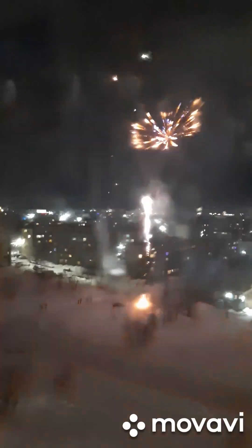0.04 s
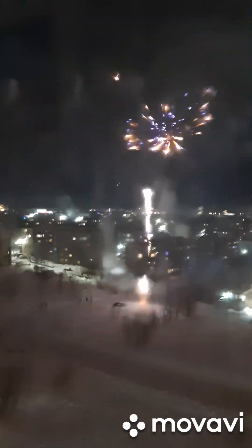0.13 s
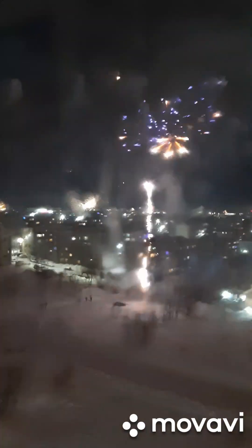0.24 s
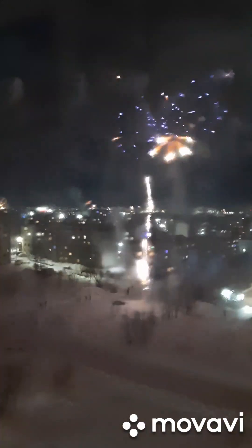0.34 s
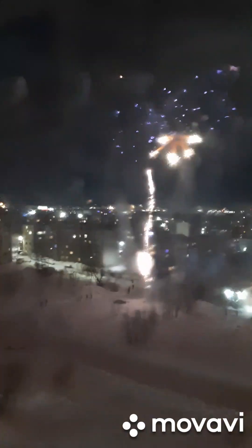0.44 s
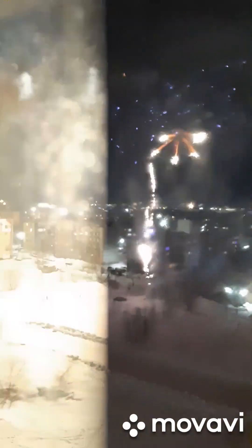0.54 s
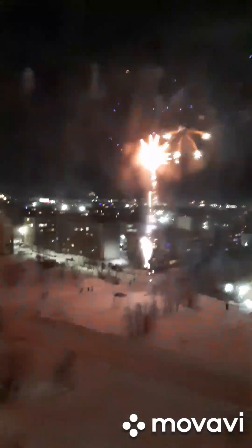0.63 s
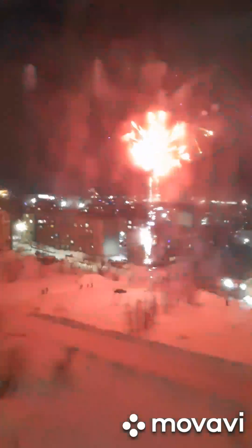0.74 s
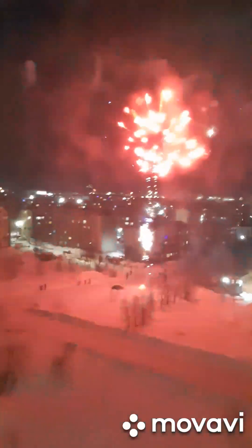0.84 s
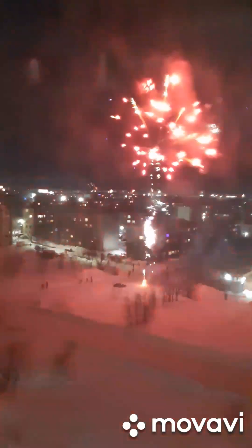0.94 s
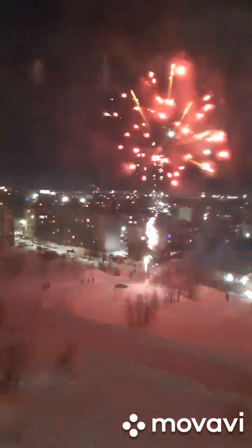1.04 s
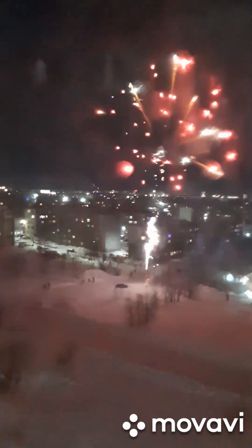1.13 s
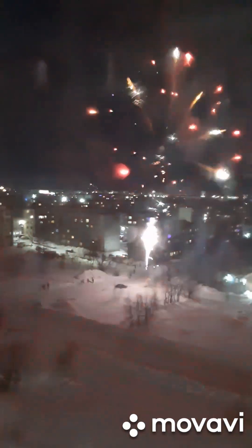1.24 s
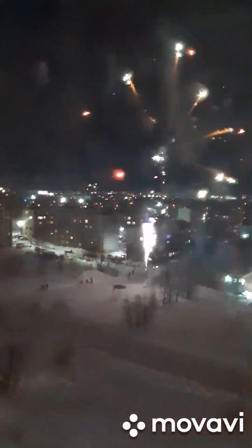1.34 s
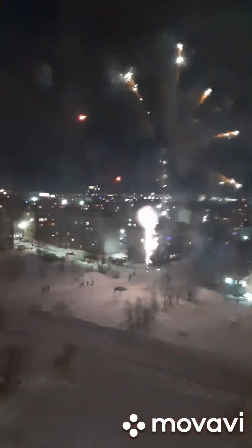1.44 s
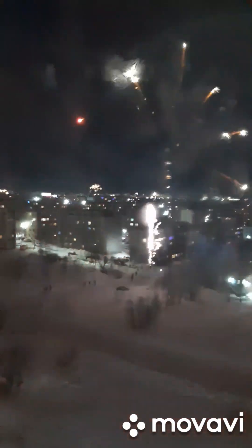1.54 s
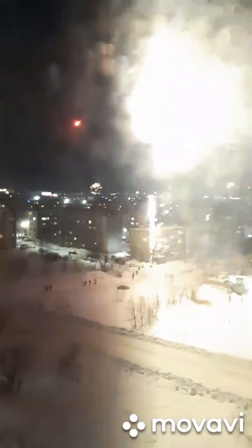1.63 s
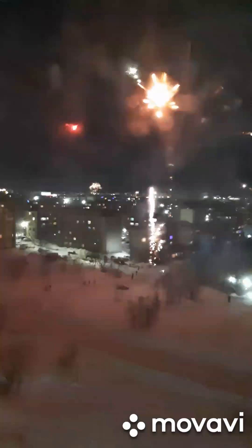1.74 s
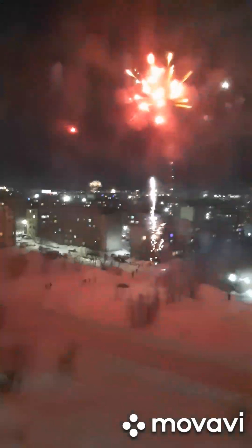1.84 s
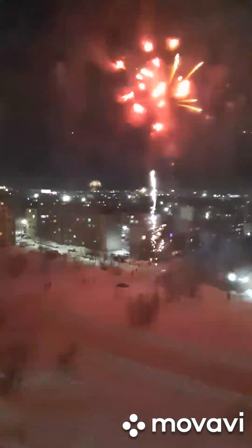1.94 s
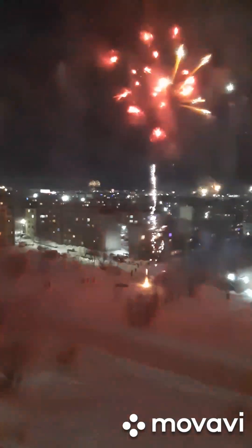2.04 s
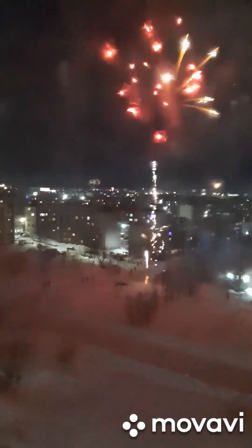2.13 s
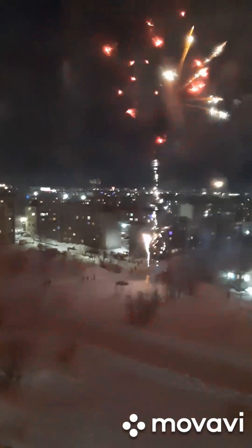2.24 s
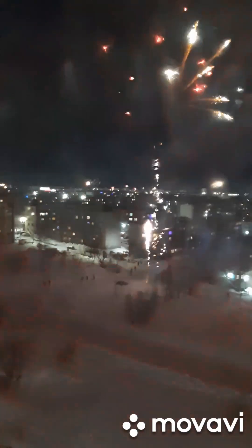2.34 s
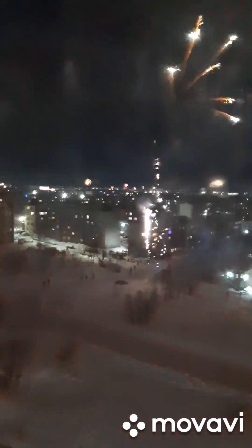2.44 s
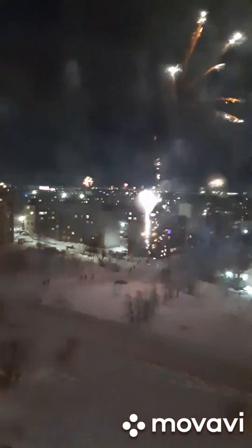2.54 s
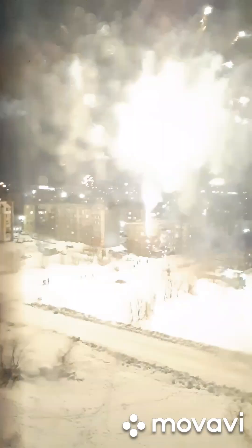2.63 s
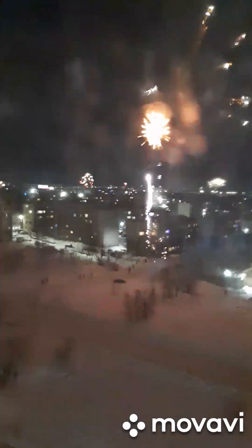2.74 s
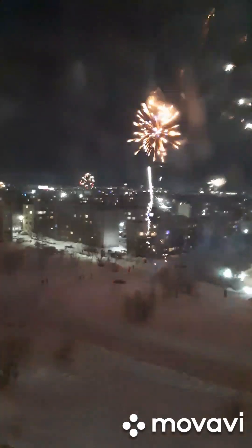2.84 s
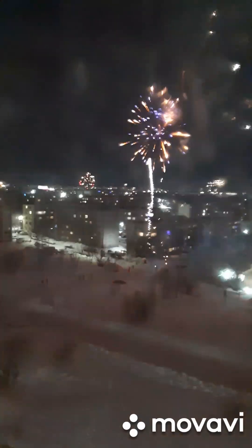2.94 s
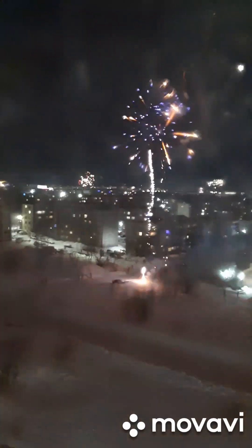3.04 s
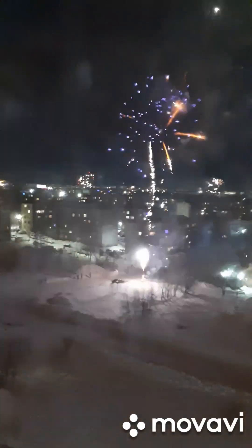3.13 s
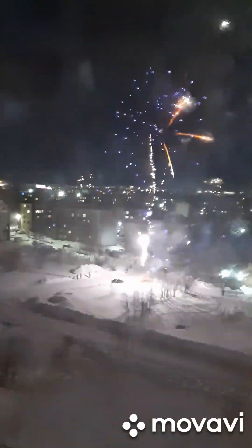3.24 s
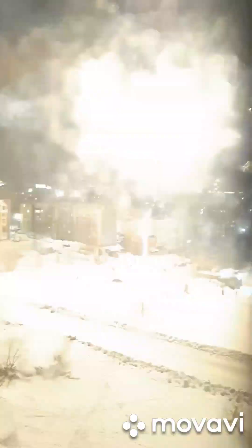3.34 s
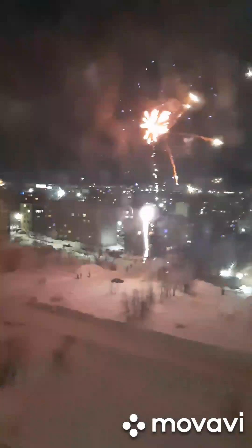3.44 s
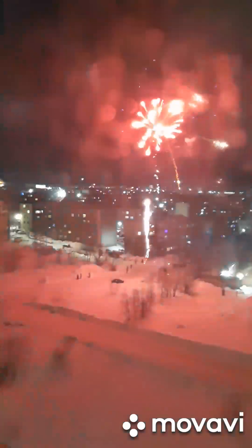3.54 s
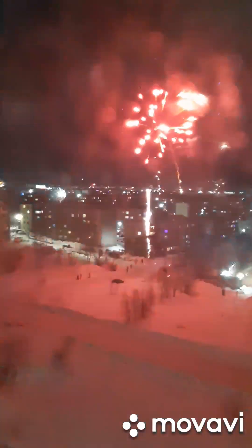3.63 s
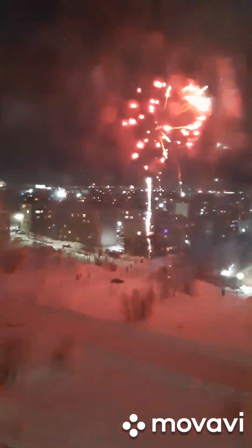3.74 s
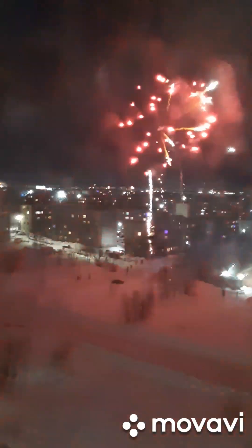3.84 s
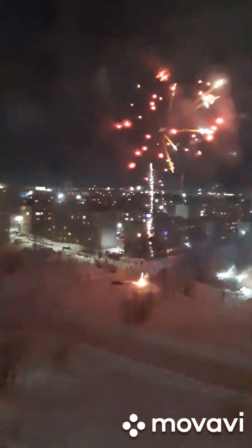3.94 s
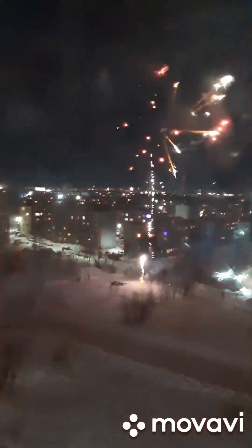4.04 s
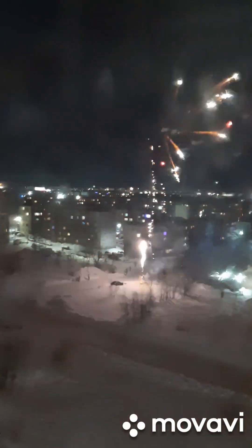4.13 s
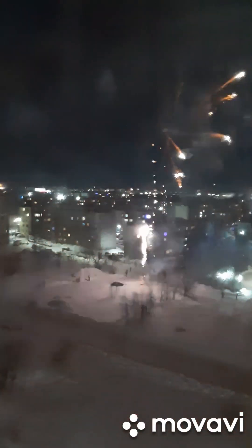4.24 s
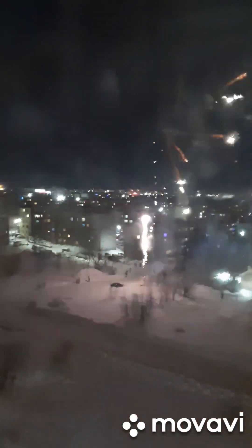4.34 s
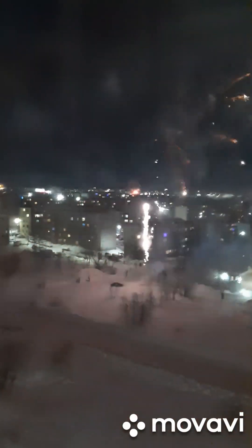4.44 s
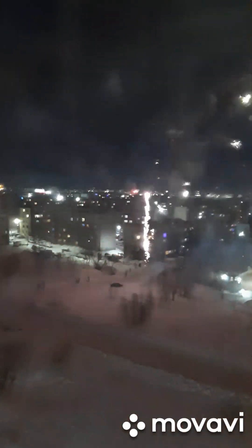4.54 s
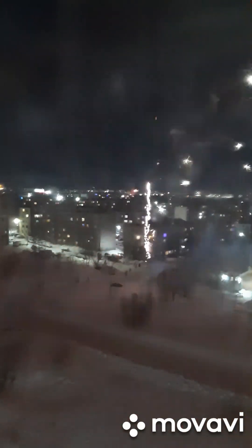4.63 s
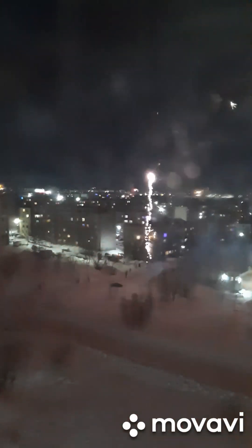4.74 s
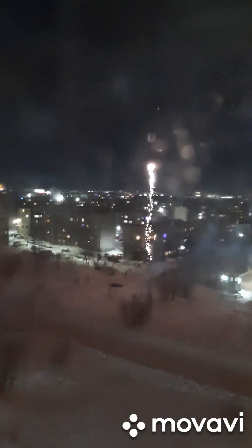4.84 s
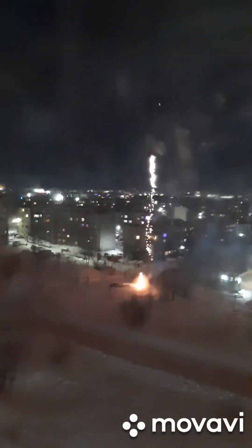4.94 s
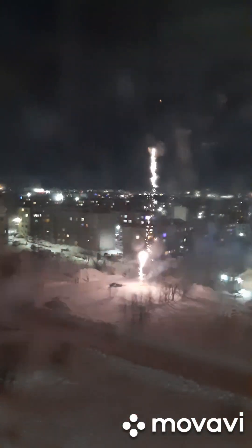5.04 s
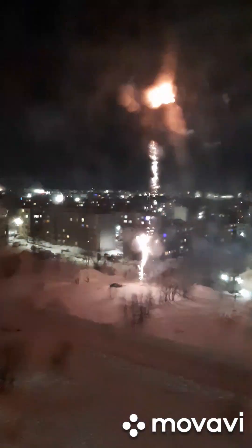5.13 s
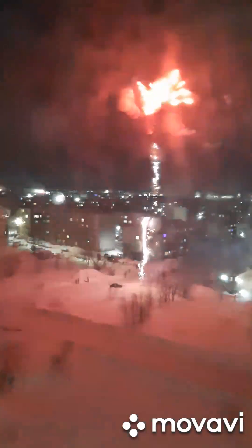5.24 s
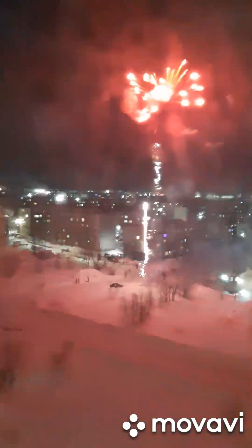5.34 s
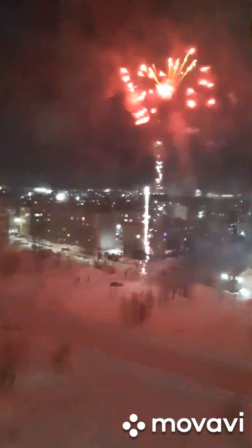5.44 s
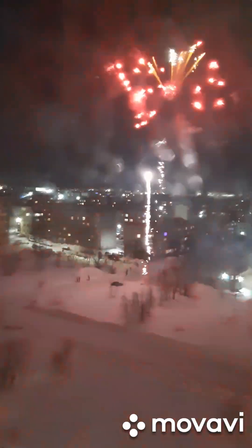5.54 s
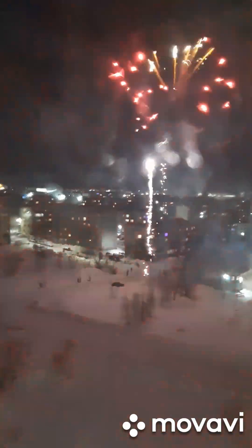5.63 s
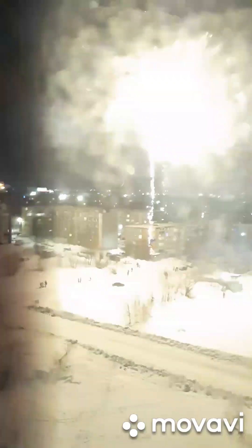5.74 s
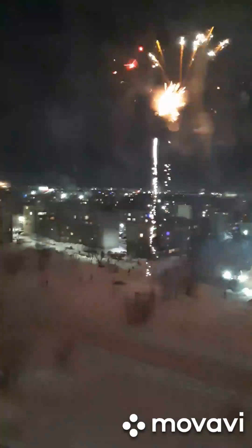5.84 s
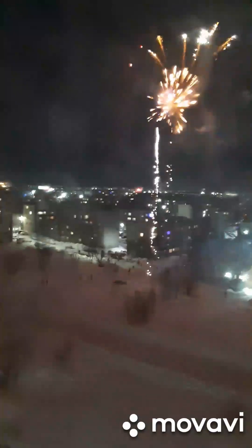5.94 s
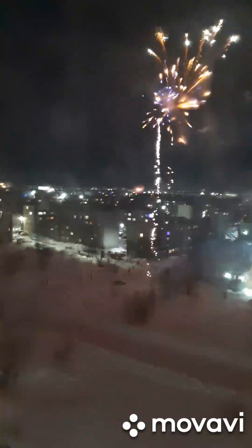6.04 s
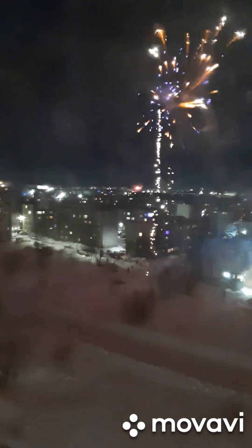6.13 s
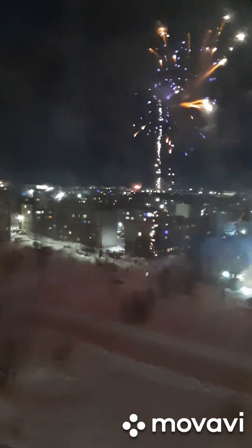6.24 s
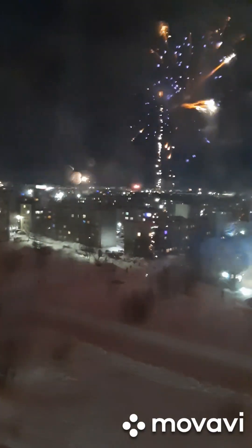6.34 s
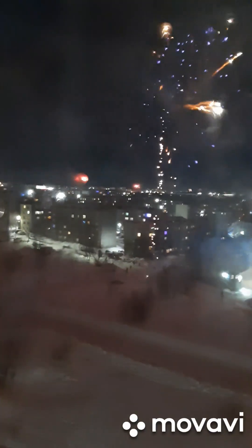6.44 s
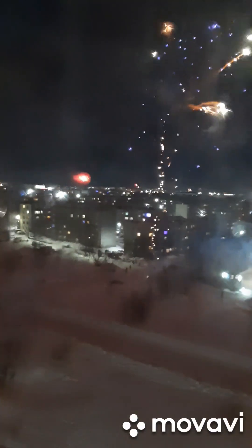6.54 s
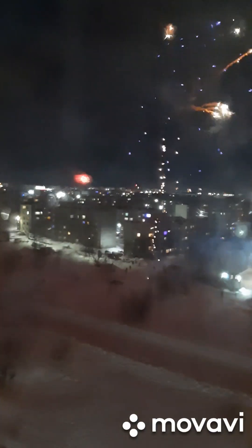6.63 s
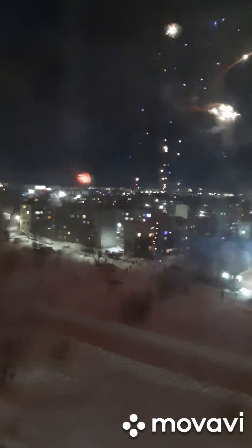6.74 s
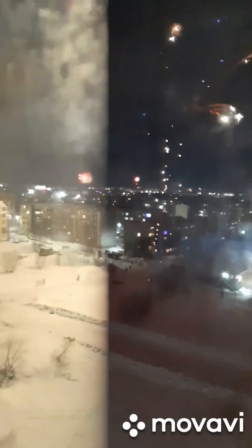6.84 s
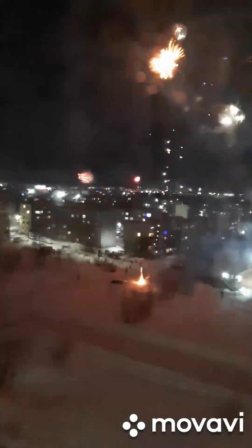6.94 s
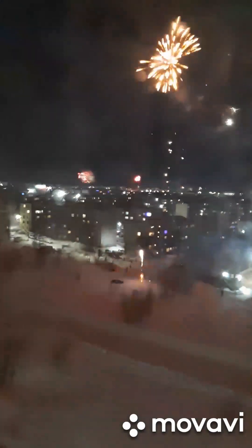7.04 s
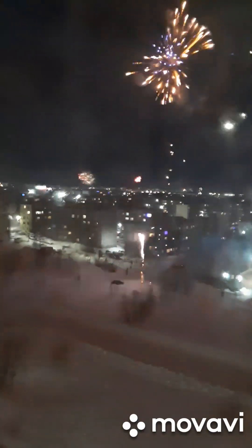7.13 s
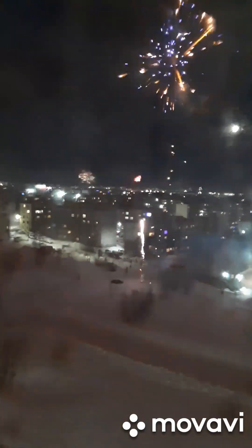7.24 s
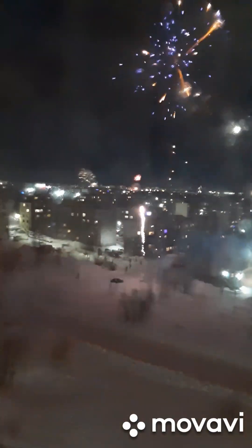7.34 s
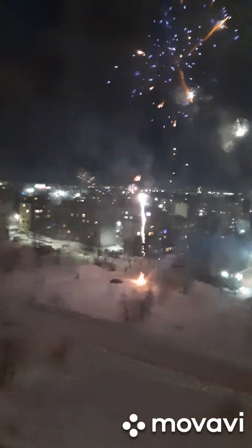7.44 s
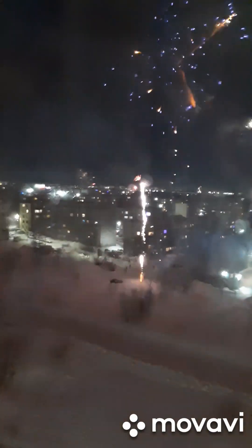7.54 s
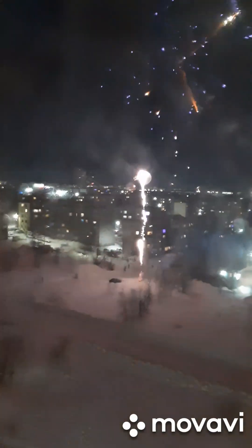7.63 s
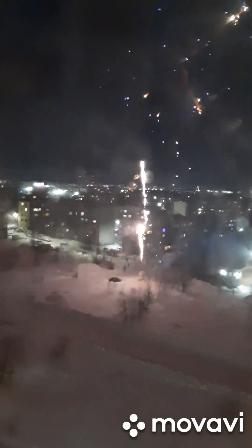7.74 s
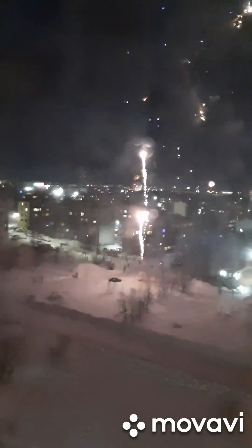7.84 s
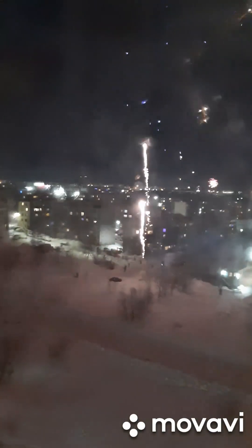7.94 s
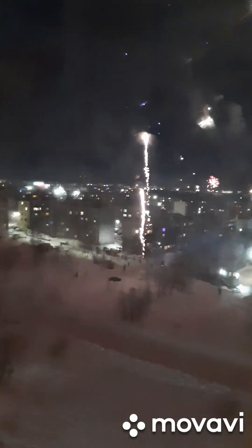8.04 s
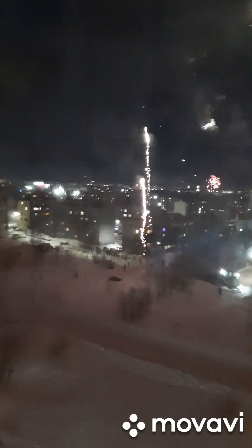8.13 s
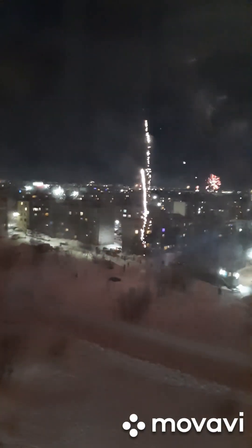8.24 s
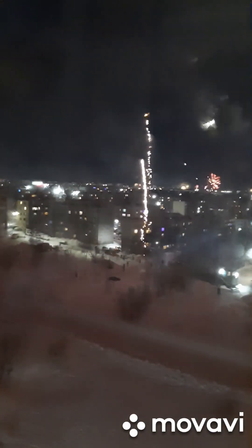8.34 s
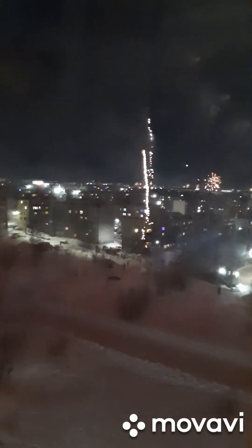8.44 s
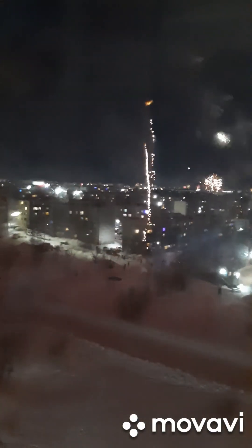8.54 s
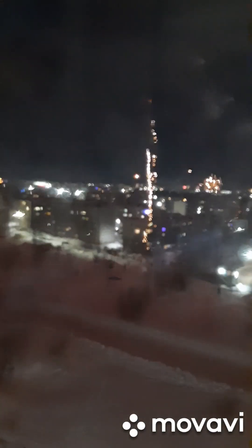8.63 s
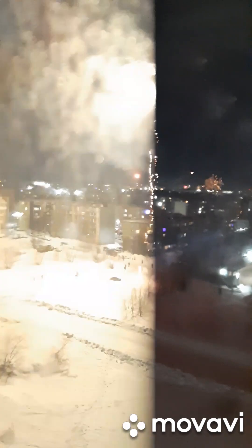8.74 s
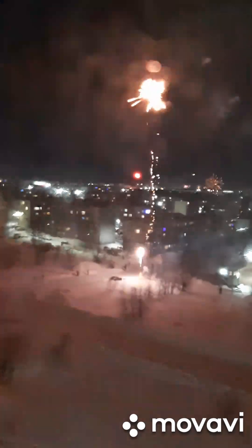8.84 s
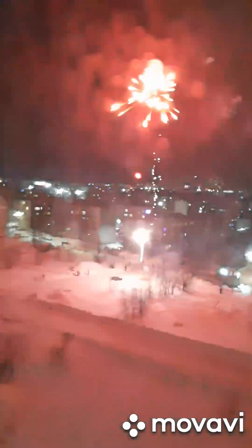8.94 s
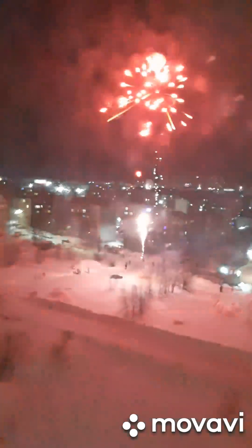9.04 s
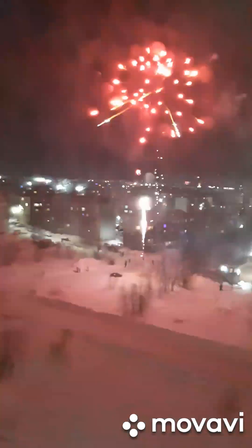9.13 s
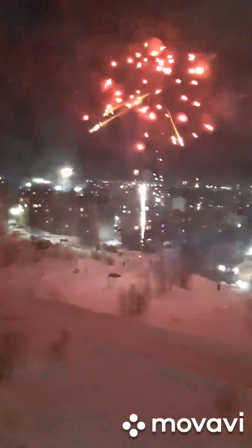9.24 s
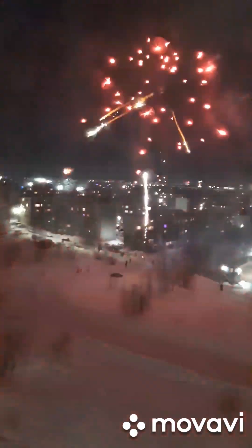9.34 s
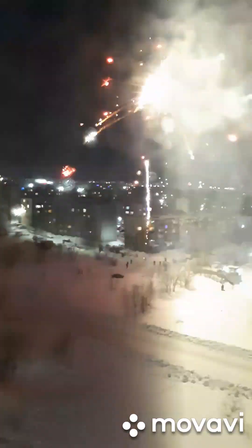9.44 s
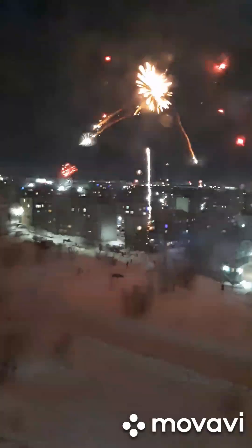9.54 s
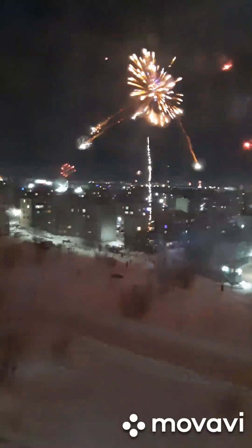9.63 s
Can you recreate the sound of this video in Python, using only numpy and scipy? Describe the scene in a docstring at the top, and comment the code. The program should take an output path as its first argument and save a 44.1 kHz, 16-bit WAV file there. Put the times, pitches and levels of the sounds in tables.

```python
"""A dull rumble and a brush of cloth, then firework bursts, heard indoors through a closed window.
It is night over a snowy yard. Each burst knocks the pane and rings the room the same way: a sum of
decaying sines. Launches are short low pulses. Soft thuds, late echoes, brief narrow-band patches and the
rumble of the town are noise with its own swells, and so are the cloth near the microphones and the hiss."""
import sys
import numpy as np
from scipy import signal
from scipy.fft import rfft, irfft, next_fast_len
from scipy.io import wavfile
from scipy.ndimage import uniform_filter1d

SR = 44100
rng = np.random.default_rng(int(sys.argv[2]) if len(sys.argv) > 2 else 0)


def generate_wav(sig):
    """Save sig (samples, or channels by samples) to the path in sys.argv[1] as 16-bit PCM at SR."""
    pcm = np.round(np.clip(np.atleast_2d(sig).T, -1, 1) * 32767).astype(np.int16)
    wavfile.write(sys.argv[1], SR, pcm)


N = 426447  # length in samples


def gain_of(db):
    """Turns decibels into a factor."""
    return 10 ** (np.asarray(db) / 20)


def evened(x):
    """Scales a sound to an average strength (rms) of 1."""
    return x / np.sqrt(np.mean(x ** 2) + 1e-20)


def read(points, hz):
    """Reads a table of (Hz, value) points, joined by straight lines over log frequency."""
    f, value = np.transpose(points)
    return np.interp(np.log(hz + 1), np.log(f + 1), value)


# How alike the two channels of a noise are.
# Each row: frequency in Hz, likeness (1 the same, 0 unrelated, below 0 partly opposed).
LIKENESS = [(60, 0.91), (180, 1), (550, 0.77), (1650, -0.2), (4970, -0.13), (15000, -0.04)]


def noise(colour, alike=True):
    """Two channels of coloured noise, as alike as the sound field makes them, or unrelated."""
    size = next_fast_len(N)
    hz = np.fft.rfftfreq(size, 1 / SR)
    left, other = rfft(rng.standard_normal((2, size)))
    same = np.clip(read(LIKENESS, hz), -1, 1) * alike
    right = same * left + np.sqrt(1 - same ** 2) * other
    coloured = np.array([left, right]) * gain_of(read(colour, hz))
    return evened(irfft(coloured, size)[:, :N])


def swell(events, rise, t60):
    """Envelope of events (s, dB) that rise and die away, each for 2 s at most; their powers add."""
    power = np.zeros(N)
    t = np.arange(2 * SR) / SR
    rises = rise * np.ones(len(events))
    falls = t60 * np.ones(len(events))  # seconds to fall by 60 dB
    for (start, db), up, fall in zip(events, rises, falls):
        part = power[round(start * SR):][:len(t)]
        envelope = gain_of(db - 60 * t / fall) * np.minimum(t / up, 1)
        part += envelope[:len(part)] ** 2  # adds into power itself
    return np.sqrt(power)


def uneven(depth_db, seconds):
    """A gain that wanders at random, with a new target every few moments and an rms of 1."""
    wander = np.interp(np.arange(N) / SR / seconds, np.arange(2000), rng.standard_normal(2000))
    return evened(gain_of(depth_db * wander))


def patchy(x, patchy_db, bins, frames):
    """Random patches of frequency and time swell and sink; the bass stays nearly even."""
    hz, _, z = signal.stft(x, SR, nperseg=1024)
    patches = rng.standard_normal(z.shape[:0:-1])  # time by frequency
    patches = uniform_filter1d(patches, frames, axis=0)
    patches = evened(uniform_filter1d(patches, bins, axis=1)).T
    patches = patches * read([(300, 0.058), (700, 1)], hz)[:, None]
    return evened(signal.istft(z * gain_of(patchy_db * patches), nperseg=1024)[1][:, :N])


# Pane and room ringing together.
# Each row: pitch in Hz, level in dB against the other rows, time to fall by 60 dB in seconds,
# direction of the first swing at the microphones (1 or -1).
ROOM_MODES = [(89.5, -26.5, 0.31, -1), (114.6, -15, 0.23, -1), (132.34, -15, 0.56, -1),
              (138.5, -19, 0.61, 1), (150.4, -11, 0.48, -1), (169, -13, 0.52, 1), (189.06, -7.5, 0.59, 1),
              (214.3, 1, 0.15, 1), (224.57, -1.5, 0.36, -1), (245.4, -11, 1.0, 1), (248, -15, 1, -1),
              (264.4, -9, 0.32, 1), (284.6, -14.5, 0.53, 1), (276, -32.5, 0.41, 1),
              (326.3, -14.5, 0.72, -1), (345.5, -3.5, 0.14, -1), (392.8, -19.5, 0.38, 1),
              (403, -24.5, 0.18, 1), (449, -21.5, 0.96, 1), (501.8, -18.5, 1, -1), (574.4, -9.5, 0.044, 1),
              (697, -25, 0.2, -1), (850.7, -16.5, 0.12, -1), (954, -12, 0.039, 1)]
# The blast arrives again, inverted. In order: delay in seconds, factor.
GROUND_ECHO = (.0198, -.62)


def ring():
    """The answer of pane and room to one blast and its ground echo: decaying sines, one per mode."""
    t = np.arange(SR) / SR
    modes = sum(np.sign(way) * gain_of(db - 60 * t / t60) * np.sin(2 * np.pi * hz * t)
                for hz, db, t60, way in ROOM_MODES)
    modes *= np.minimum(t / .001, 1)  # the pane takes a moment to move
    delay, factor = GROUND_ECHO
    echo = factor * np.interp(t - delay, t, modes, left=0)
    both = modes + echo
    return both / np.sqrt(np.mean(both[:SR // 20] ** 2))  # rms 1 over the first 50 ms


def ringing_noise():
    """Scattered sound from many sides keeps the modes going, with broader peaks than one blast."""
    pair = noise([(60, 0.026), (1000, 0.0078)])  # almost equally strong at all frequencies
    short_ring = ring() * gain_of(-90 * np.arange(SR) / SR)
    return evened(signal.oaconvolve(pair, short_ring[None], axes=1)[:, :N])


# Colour of the far rumble. Each row: frequency in Hz, relative level in dB per Hz.
RUMBLE_COLOUR = [(15, -59), (25, -39), (140, -9), (155, -1.5), (192, -7), (213, 2), (248, -9.5),
                 (270, -3.5), (320, -5), (348, -12), (672, -18.5), (849, -22), (985, -23), (1330, -35),
                 (4000, -65.5), (5200, -80), (8800, -120)]
TOWN_DB = -50  # steady part of the rumble
ROLL_RISE_S, ROLL_T60_S = 0.24, 4.2  # each burst's roll swells and fades
LUMPS_DB, LUMP_S = 0.75, 0.057  # depth and length of the lumps


def rumble(rung):
    """Far fireworks rumble in lumps; long echoes of each burst roll unevenly over the town."""
    rows = np.array(BURSTS)
    rolls = swell(rows[:, [0, 6]], ROLL_RISE_S, ROLL_T60_S)
    level = np.hypot(gain_of(TOWN_DB), rolls)
    sound = patchy(noise(RUMBLE_COLOUR) + 0.55 * rung, patchy_db=3.0, bins=6, frames=3)
    return level * uneven(LUMPS_DB, LUMP_S) * sound


# Cloth brushing by. Each row: peak time in seconds, peak level in dB, rise in seconds, fall in seconds.
BRUSHES = [(0.1, -63, 0.22, 0.22), (0.67, -70.5, 0.37, 0.56), (1.02, -78, .06, .3), (2.1, -75, 0.19, .3),
           (2.339, -74, 0.32, 0.47), (2.72, -72, 0.35, 0.25), (3.6, -82, 1.2, .5), (4.38, -79.5, .3, .6),
           (4.79, -71, .15, 0.35), (5.12, -71.5, 0.59, 0.92), (5.88, -73.5, .3, .2), (6.08, -75, .15, .5),
           (6.9, -85, 1.5, 1.1), (8.05, -77, 0.23, 0.38), (8.7, -79.5, 0.91, .25), (8.87, -73.5, .05, .2),
           (8.97, -67, 0.093, .4)]
# Colours of cloth and hiss. Each row: frequency in Hz, relative level in dB per Hz.
RUSTLE_COLOUR = [(880, -33.5), (1500, -3), (2240, -2), (2630, -11.5), (3010, -9.5), (7590, -10),
                 (8710, -18), (13300, -14), (15700, -22.5)]
HISS_COLOUR = [(1180, -34.5), (2000, -2), (3500, -23.5), (7540, -8.5), (8660, -19.5), (14900, -21),
               (15700, -29.5)]
REST_DB, HISS_DB = -92.5, -103  # cloth at rest; steady hiss
BRUSH_EDGE_DB = -16  # change from the peak after one rise or fall time; the slope then goes on
FLICKER_DB, FLICKER_S = 1, .012  # depth and length of the grain in the rustle


def rustle():
    """Cloth and hands brush near the microphones, over the hiss of the recorder."""
    t = np.arange(N) / SR
    power = gain_of(REST_DB) ** 2
    for peak, db, rise, fall in BRUSHES:
        away = np.where(t < peak, (peak - t) / rise, (t - peak) / fall)
        power = power + gain_of(db + BRUSH_EDGE_DB * away) ** 2
    cloth = np.sqrt(power) * uneven(FLICKER_DB, FLICKER_S) * noise(RUSTLE_COLOUR, alike=False)
    return cloth + gain_of(HISS_DB) * noise(HISS_COLOUR, alike=False)


# Soft thuds, late echoes and brief narrow-band patches of noise.
# Each row: start in seconds, body level in dB, treble level in dB, level of the noise band in dB,
# its centre in Hz, rise in seconds, time to fall by 60 dB in seconds.
THUDS_AND_PATCHES = [(0.198, -44, -72, -84, 900, 0.0041, 0.14),
                     (0.456, -43.5, -63.5, -63.5, 2760, 0.0038, 0.68),
                     (1.298, -44.5, -76, -85, 2900, 0.016, 0.99),
                     (1.705, -49.5, -85.5, -86.5, 2970, 0.0047, 0.7),
                     (2.386, -38, -58.5, -76, 2960, 0.035, 0.61), (3.414, -48, -63.5, -79, 3030, 0.0089, 1),
                     (3.461, -56.5, -83, -43, 770, 0.0021, 0.21), (4.345, -50.5, -66.5, -89, 2880, .004, 1),
                     (4.491, -49.5, -83, -45, 530, 0.01, 0.33), (4.87, -53, -65.5, -49, 716, 0.0033, 0.18),
                     (5.124, -54.5, -67, -69, 2860, 0.0025, 0.81),
                     (5.342, -39, -58.5, -66, 3260, 0.0012, 0.65),
                     (5.834, -53, -82, -42, 620, 0.0057, 0.075),
                     (6.066, -54.5, -63, -59, 1630, .0015, 0.96), (6.43, -58, -69, -75, 3820, 0.024, 0.37),
                     (9.05, -37, -69, -57, 810, 0.0034, 0.92), (9.105, -57, -62, -63, 1900, 0.025, 0.81)]
BAND_SPREAD_OCT = .25  # width of the noise band in octaves


def thuds_and_patches(rung, body, treble):
    """Swells of ringing bass and treble, and a noise band with its own centre for each row."""
    s, body_db, treble_db, band_db, centre_hz, rise, t60 = np.transpose(THUDS_AND_PATCHES)
    out = swell(np.c_[s, body_db], rise, t60) * (rung + body)
    out += swell(np.c_[s, treble_db], rise, t60) * treble
    t = np.arange(2 ** 15) / SR
    hz = np.fft.rfftfreq(2 ** 15, 1 / SR)
    for k in range(len(s)):
        octaves_off = np.log2((hz + 1) / centre_hz[k])
        band = np.exp(-.5 * (octaves_off / BAND_SPREAD_OCT) ** 2)
        coloured = evened(irfft(rfft(rng.standard_normal((2, len(t)))) * band))
        envelope = gain_of(band_db[k] - 60 * t / t60[k]) * np.minimum(t / rise[k], 1)
        part = out[:, round(s[k] * SR):][:, :len(t)]
        part += (envelope * coloured)[:, :part.shape[1]]
    return out


# Launches from the ground. Each row: time of the thump in seconds, thump peak in dB,
# scattered body level in dB, scattered treble level in dB.
LAUNCHES = [(2.7876, -18.5, -31.5, -45.5), (7.7054, -21, -33.5, -49)]
# Colour of their brighter part. Each row: frequency in Hz, relative level in dB per Hz.
LAUNCH_TREBLE = [(530, -28), (900, 0), (1090, -9), (1260, -9.5), (1960, -20), (2330, -21.5), (4340, -50),
                 (8000, -54.5), (10400, -94), (17600, -120)]


def launches(rung, body, treble):
    """A dull thump, a short 240 Hz pulse; most of the brighter part follows off the ground and walls."""
    s, thump_db, body_db, treble_db = np.transpose(LAUNCHES)
    t = np.arange(N) / SR
    thumps = sum(gain_of(db) * np.exp(-((t - s0) / 0.0028) ** 2) * np.cos(2 * np.pi * 240 * (t - s0))
                 for s0, db in zip(s, thump_db))
    dull = swell(np.c_[s + .003, body_db], 0.0033, 0.94) * rung
    dull += swell(np.c_[s + .011, body_db - 3], 0.0027, 0.6) * body
    first = swell(np.c_[s - .004, treble_db - 1.5], .0012, .08)
    later = swell(np.c_[s + .01, treble_db], 0.0054, 0.77)
    bright = np.hypot(first, later) * (noise(LAUNCH_TREBLE) + 0.21 * treble)
    return thumps + dull + bright


def shock():
    """The blast front itself: pressure creeps up, drops at once and recovers; the left port faces it."""
    t = np.arange(400) / SR - .0023  # the drop comes at t = 0
    wave = np.where(t < 0, np.exp(t / 0.0011), -np.exp(-np.abs(t) / 0.00024))
    rounded = uniform_filter1d(uniform_filter1d(wave, size=11), size=8)
    return np.array([1, .4])[:, None] * rounded


# Shells bursting in the sky. Each row: start in seconds, ring level in dB, scattered body in dB,
# scattered treble in dB, house-front echo in dB, window-frame tick in dB, roll over the town in dB.
BURSTS = [(.2420, -21.5, -28.5, -48, -38.5, -79, -41), (0.989, -21.5, -28, -46, -41, -56, -41.5),
          (2.0635, -21, -27, -47, -49.5, -81, -44), (3.0679, -20.5, -29.5, -47.5, -42.5, -67, -40.5),
          (3.7681, -24, -31, -50, -41.5, -86, -40.5), (5.5077, -22, -30.5, -48, -38.5, -64, -42.5),
          (6.1699, -22.5, -30.5, -50, -39.5, -78.5, -41.5), (7.2966, -22, -28.5, -47, -49, -85, -42.5),
          (9.1799, -21, -30, -48.5, -42, -67, -41)]
# Echoes of the house fronts. In order, in seconds after the burst: start, peak, end of the hold, silence.
HOUSE_ECHO = (.27, .36, .47, .62)
# Colours of the first instant, the top of the bang and the tick.
# Each row: frequency in Hz, relative level in dB per Hz.
KNOCK = [(400, -29.5), (650, -6), (1000, 6.5), (1400, -9.5), (3000, -23.5), (5000, -55)]
SPRAY = [(2500, -29.5), (3800, 1), (6300, -3.5), (8000, -10.5), (8700, -26.5), (15500, -27)]
TICK = [(3000, -38), (6000, -0.5), (8000, -0.5), (15500, -8.5)]


def bursts(rung, body, treble):
    """The same ring for every shell, a sharp front, scattered sound dying in the room, late echoes."""
    s, ring_db, body_db, treble_db, echo_db, tick_db, _ = np.transpose(BURSTS)
    blows = np.zeros(N)
    blows[np.round(s * SR).astype(int)] = gain_of(ring_db)
    direct = signal.oaconvolve(blows, ring())[:N]
    direct = direct + gain_of(-6) * signal.oaconvolve(blows[None], shock(), axes=1)[:, :N]
    front = s + .0009
    scattered = swell(np.c_[front, body_db], 0.01, 0.65) * body
    scattered += swell(np.c_[front, treble_db], 0.00091, 0.68) * treble
    hard_start = swell(np.c_[front, treble_db + 13], .001, .045)
    slower_end = swell(np.c_[front, treble_db + 7], 0.0014, 0.22)
    crack = np.hypot(hard_start, slower_end) * noise(KNOCK)
    spray = swell(np.c_[front, treble_db - 19], .001, 0.29) * noise(SPRAY)
    # the window frame snaps
    tick = swell(np.c_[front, tick_db], .0008, 0.032) * noise(TICK, alike=False)
    t = np.arange(N) / SR
    # a faint floor of 0.09 sounds even before each echo swells
    late = np.sqrt(sum((gain_of(db) * np.interp(t - s0, HOUSE_ECHO, [0.09, 0.7, 0.58, 0])) ** 2
                       for s0, db in zip(s, echo_db)))
    echoes = late * (rung + gain_of(-28.5) * treble)
    return direct + scattered + crack + spray + tick + echoes


# Colours of scattered sound through the pane. Each row: frequency in Hz, relative level in dB per Hz.
BODY = [(18, -63), (30, -32), (96, -26.5), (123, -11), (221, -9), (252, -15), (327, -16.5), (405, -16.5),
        (673, -25), (918, -24.5), (1500, -49.5), (1950, -77), (3300, -120)]
TREBLE = [(650, -33.5), (1100, 1), (1160, -7), (1260, -4), (1550, -7), (2110, -12.5), (2950, -11),
          (3440, -20.5), (4690, -34), (6320, -36.5), (7630, -45), (8720, -54.5), (12800, -48), (15500, -49)]


def scene():
    """All sound that has passed the pane, and the rustle indoors."""
    rung = ringing_noise()
    body = noise(BODY)
    treble = patchy(noise(TREBLE), patchy_db=1.5, bins=6, frames=5)
    soft = rumble(ringing_noise()) + thuds_and_patches(rung, body, treble)
    loud = launches(rung, body, treble) + bursts(rung, body, treble)
    return soft + loud + rustle()


# How much louder the left port is. Each row: frequency in Hz, difference in dB.
LEFT_OVER_RIGHT = [(60, 13.5), (150, 3.5), (380, 4.5), (950, 2.5), (2380, -1.5), (5980, 4.5), (15000, 1.5)]
# How far the right port is ahead. Each row: frequency in Hz, phase in radians.
RIGHT_LEADS = [(60, 0.19), (200, 0.39), (320, 0.43), (1000, 0.052)]
EDGE_HZ = 15900  # nothing much passes above this


def record(dry):
    """Two unequal microphone ports share the level and phase difference, then comes the band limit."""
    size = next_fast_len(N + SR)
    hz = np.fft.rfftfreq(size, 1 / SR)
    half = gain_of(read(LEFT_OVER_RIGHT, hz) / 2) * np.exp(-.5j * read(RIGHT_LEADS, hz))
    bass_cut = hz ** 2 / (hz ** 2 + 38. ** 2)  # small capsules lose the deepest bass
    ports = irfft(rfft(dry, size) * bass_cut * np.array([half, 1 / half]), size)[:, :N]
    ports *= np.minimum(np.arange(N)[::-1] / 200, 1)  # ends without a click
    low_pass = signal.firwin(511, EDGE_HZ, window=("kaiser", 9), fs=SR)
    return signal.oaconvolve(ports, low_pass[None], "same")


dry = scene()
out = record(dry)
generate_wav(out)
```